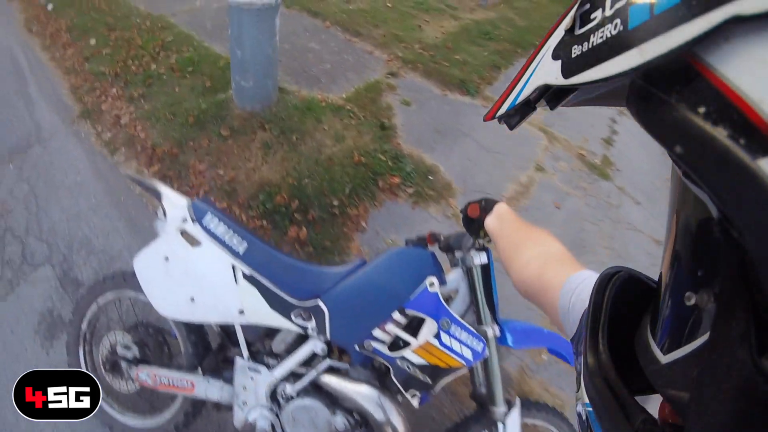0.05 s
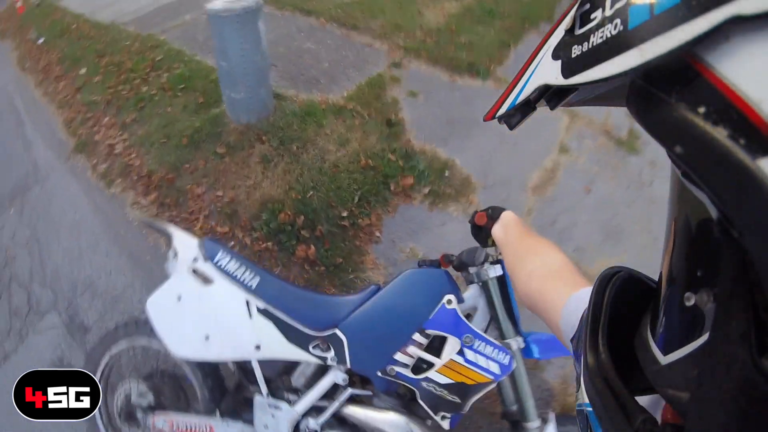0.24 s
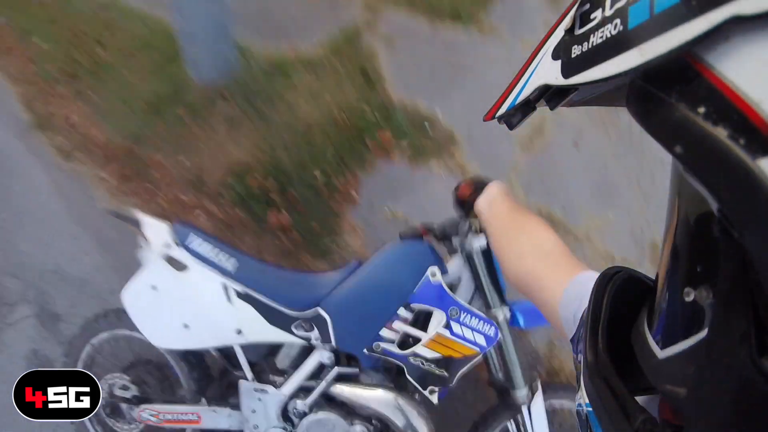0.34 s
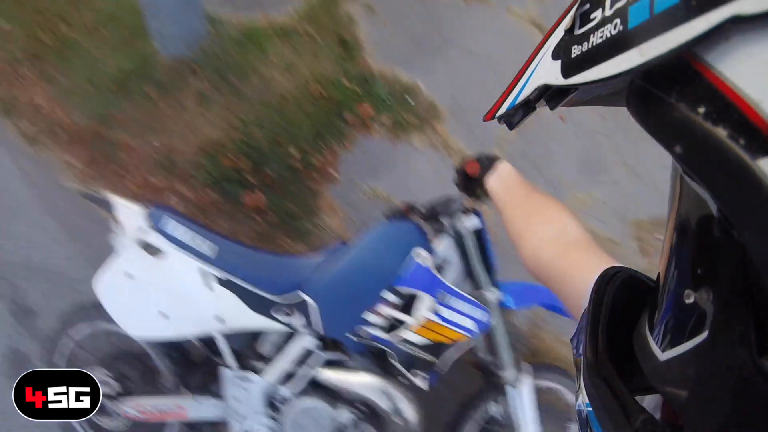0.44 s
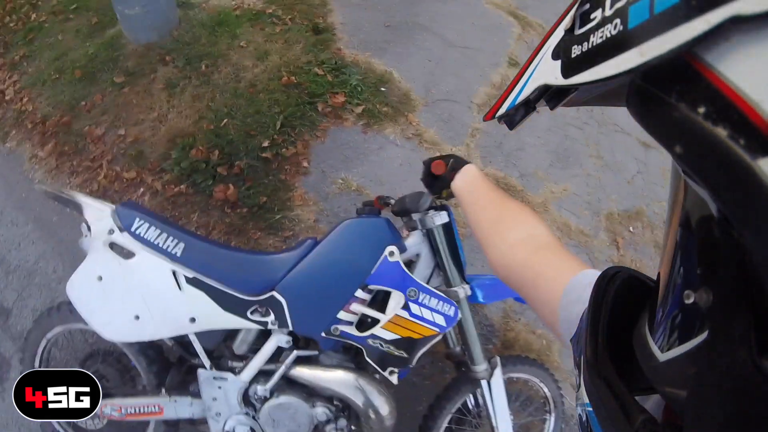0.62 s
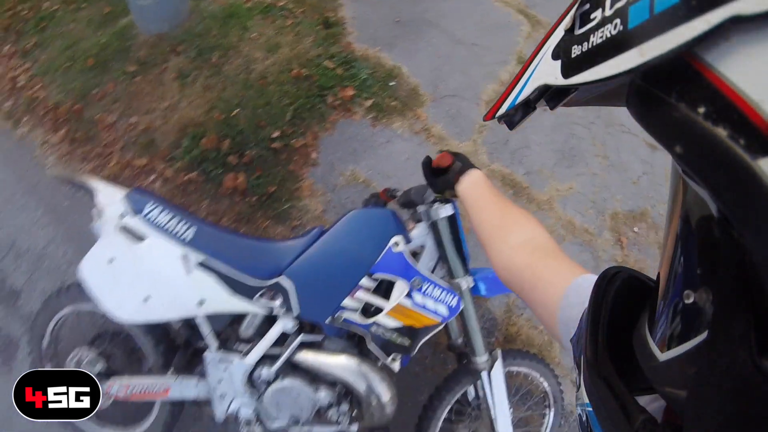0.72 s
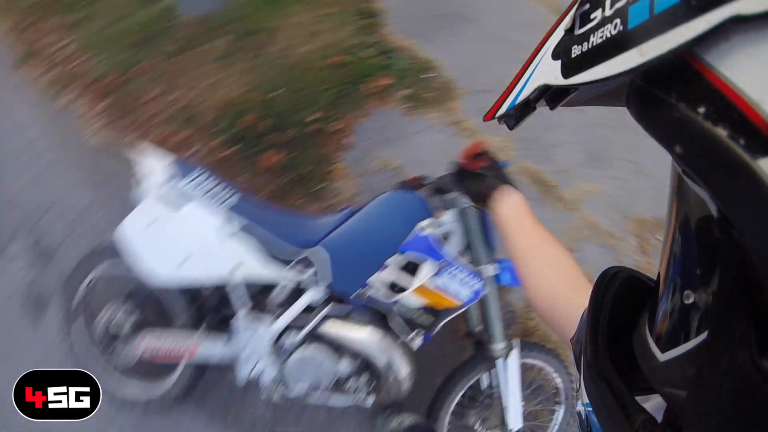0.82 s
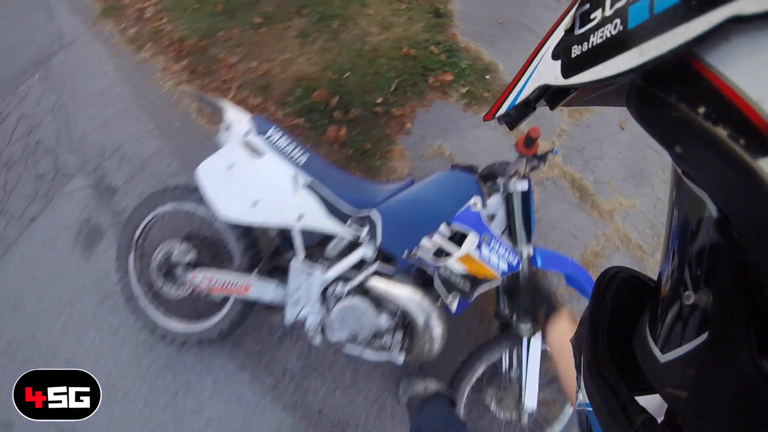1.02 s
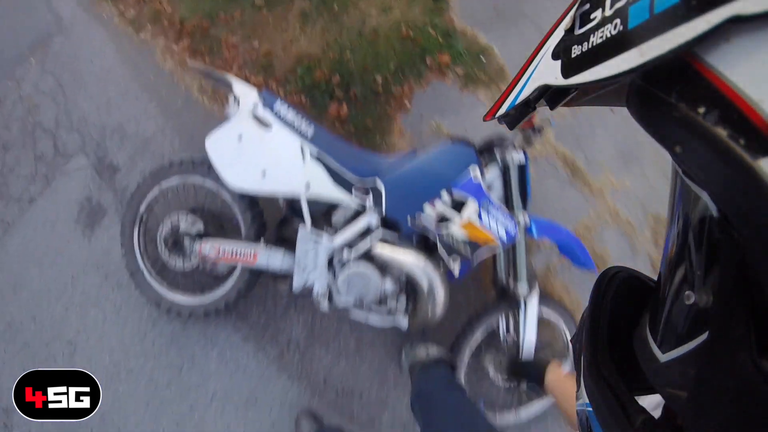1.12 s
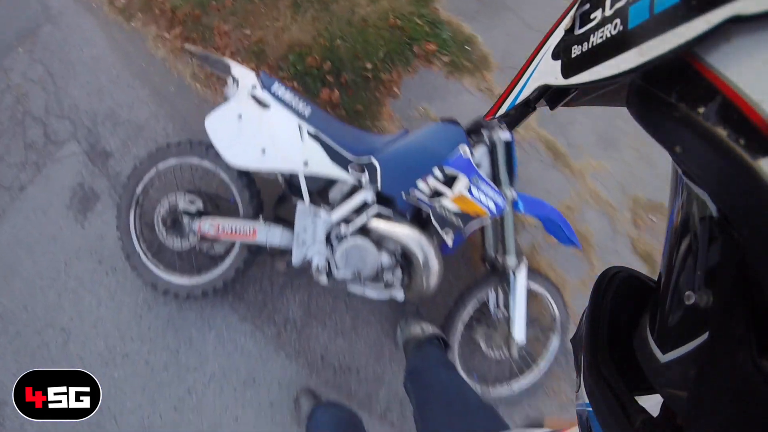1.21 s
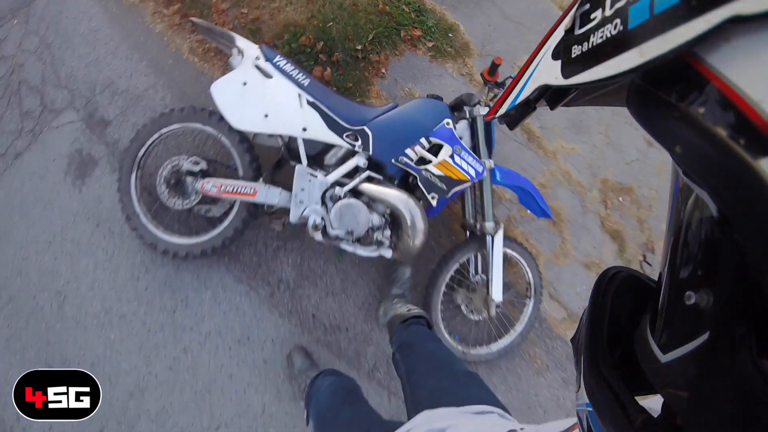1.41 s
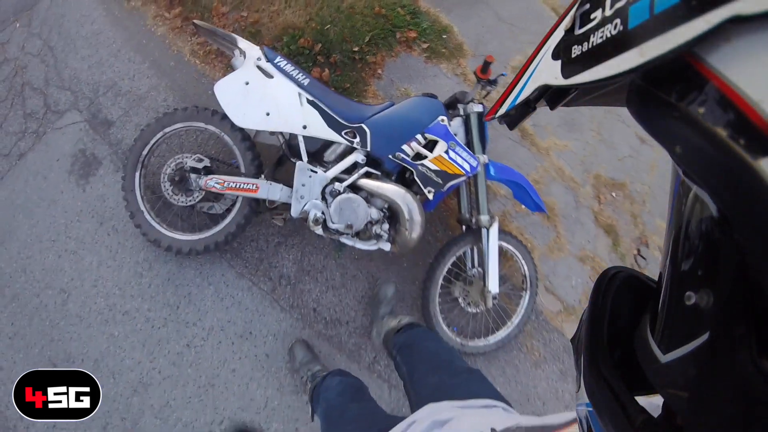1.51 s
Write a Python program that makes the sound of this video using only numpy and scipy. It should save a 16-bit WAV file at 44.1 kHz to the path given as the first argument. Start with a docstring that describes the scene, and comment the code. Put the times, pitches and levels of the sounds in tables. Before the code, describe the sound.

Close by, a dirt bike rattles sharply twice as its stand clanks onto the pavement and takes the weight. Fading plastic knocks follow, then faint boot scuffs, over light wind rumble and a distant outdoor rush.

```python
"""A dirt bike, engine off, is let down onto its stand on pavement.
Loose metal parts clack in two bursts, a lever pings against its stop and the stand clanks.
The frame thuds as the weight lands, and plastic panels knock ever more softly as the bike settles.
A tyre rolls faintly on grit at the start, and boots scuff near the end.
Light wind and a distant outdoor rush go on behind it all."""
import sys
import numpy as np
from scipy import signal
from scipy.fft import rfft, irfft, next_fast_len
from scipy.io import wavfile
from scipy.ndimage import map_coordinates

SR = 44100
rng = np.random.default_rng(int(sys.argv[2]) if len(sys.argv) > 2 else 0)


def transcribe(u):
    """Save the signal u as a 16-bit wav file named by the first command-line argument.

    u: samples, shape (n,) or (channels, n), limited to [-1, 1]; the rate is SR.
    q: integer samples, one column per channel.
    """
    v = np.clip(np.atleast_2d(u).T, -1, 1)
    q = np.round(v * 32767).astype(np.int16)
    wavfile.write(sys.argv[1], SR, q)


N = 68355
T = np.arange(N) / SR
RING_T = T[:SR // 3]  # the seconds that pass during one hit


# Loose parts colliding. Each row: start in seconds, ring, crack and sizzle levels in dB,
# chatter fade time in seconds, pitch multiplier. A fade time is how long a 60 dB drop takes.
METAL_HITS = [(0.2194, -27, -26.5, -54, 0.041, .97), (0.2225, -24.5, -28, -33, 0.045, .99),
              (0.2325, -17, -31, -24, 0.037, 1.02), (.2368, -28, -25.5, -25.5, 0.048, 1.0),
              (0.255, -37, -27.5, -37.5, 0.054, 1.01), (0.2621, -40, -26.5, -33.5, 0.025, 1.01),
              (.3515, -65, -40, -46.5, 0.078, 2.8), (.3810, -28, -32, -29.5, 0.03, 1.1),
              (0.3846, -36, -30.5, -31, 0.038, 1.1), (.3972, -27, -37, -31.5, 0.083, 1.0),
              (.4030, -43, -27.5, -34.5, 0.087, 1.0), (.4085, -29, -23.5, -26, 0.028, 1.04),
              (.4142, -21, -21, -27.5, 0.046, .88), (.4225, -25, -31.5, -34, 0.072, 1.0),
              (.4372, -38, -30, -41, 0.086, 1.1), (0.5214, -62, -33, -37, 0.029, 1.0),
              (.6380, -40, -42, -42.5, 0.038, 2.12), (.6630, -67, -65, -53, 0.032, 1.0),
              (0.733, -50, -53, -49, 0.048, 1.0), (1.052, -55.5, -62, -63, 0.027, 1.75)]
# The parts' tones. Each row: base pitch in Hz, relative level in dB, fade time in seconds.
METAL_TONES = [(909, -13, 0.045), (1660, -15, 0.018), (1798, 0.5, 0.032), (1946, -9, 0.055),
               (2444, -2, 0.031), (2748, -9, 0.051), (3320, -9.5, 0.028), (5184, -15, .03)]

def metal_parts():
    """Loose metal parts clack, ring and go on rattling against each other."""
    rings = place((start, amp(db) * ring(METAL_TONES, ratio)) for start, db, _, _, _, ratio in METAL_HITS)
    bursts = place((start, chatter(crack_db, sizzle_db, fade_s))
                   for start, _, crack_db, sizzle_db, fade_s, _ in METAL_HITS)
    return rings + bursts + shake(bursts, level_db=-9.5)


# The midrange crack of a hit. Each row: frequency in Hz, relative level in dB.
CRACK_COLOUR = [(150, -18.5), (350, -0.5), (560, -7.5), (800, -2), (1500, -1.5), (2900, -5.5),
                (3900, -21.5), (8000, -30.5), (13000, -57)]
# The bright sizzle of a hit. Each row: frequency in Hz, relative level in dB.
SIZZLE_COLOUR = [(2000, -12), (3600, -2), (4400, -4.5), (5700, 0.5), (6500, -1), (7200, -7.5), (8700, -7.5),
                 (11000, -24), (14000, -54)]
# A thin steely ring. Each row: base pitch in Hz, relative level in dB, fade time in seconds.
STEEL_TONES = [(6443, -5, 0.041), (6540, -7.5, 0.028)]

def chatter(crack_db, sizzle_db, fade_s):
    """One contact is a cluster of tiny impacts, so it sounds harsh and grainy."""
    crack = amp(crack_db) * noise(CRACK_COLOUR, len(RING_T))
    sizzle = amp(sizzle_db) * noise(SIZZLE_COLOUR, len(RING_T))
    grains = unit(amp(1.5 * wobble(per_second=1800)))[:len(RING_T)]
    detune = 1 + 0.0081 * rng.normal()  # loose parts never sit the same way twice
    steel = amp(sizzle_db) * ring(STEEL_TONES, detune)
    return (crack + sizzle) * grains * fade(fade_s, rise_s=0.00044) + steel


# Lever strikes. Each row: start in seconds, level in dB, change in dB for the upper tones and tick.
LEVER_HITS = [(0.3065, -19.5, -2), (0.3268, -25, -6.5), (0.4158, -24, -18)]
# The lever's tones. Each row: pitch in Hz, relative level in dB, fade time in seconds.
LEVER_TONES = [(1703, -1, 0.073), (2947, 3, 0.016), (3170, -8.5, 0.029)]

def lever():
    """The lever pings on its stop three times, each duller than the last."""
    pings = []
    for start, db, bright_db in LEVER_HITS:
        low = ring(LEVER_TONES[:1])
        upper = ring(LEVER_TONES[1:])
        tick = chatter(crack_db=-7.5, sizzle_db=-10.5, fade_s=0.018)
        pings.append((start, amp(db) * (low + amp(bright_db) * (upper + tick))))
    return place(pings)


# The stand meeting the pavement. Each row: start in seconds, level in dB.
STAND_HITS = [(0.4113, -26), (0.4134, -13)]
# The stand's tones. Each row: pitch in Hz, relative level in dB, fade time in seconds.
STAND_TONES = [(1573, 0.5, 0.026), (2997, -0.5, 0.02)]

def stand():
    """The stand touches down, then takes the weight: a short, hard double clank."""
    return place((start, amp(db) * ring(STAND_TONES)) for start, db in STAND_HITS)


# Weight landing on frame and tyres. Each row: start in seconds, level in dB, pitch multiplier.
FRAME_HITS = [(0.2222, -33, 1.72), (0.2315, -24, 1.245), (0.2383, -26, 1.7), (0.2612, -31, 1.23),
              (.2710, -26, 1.3), (.2960, -38, 1.12), (.3990, -18.5, 1.03), (.4110, -23, 0.93),
              (0.427, -30, 0.977), (0.519, -29.5, 0.7), (0.619, -37, 1.03), (.6900, -38.5, 1.03)]
# The frame's low tones. Each row: base pitch in Hz, relative level in dB, fade time in seconds.
FRAME_TONES = [(67.4, -9, 0.084), (137.6, -10, 0.046), (211, -0.5, 0.044), (379, -11, 0.047)]
# Its hollow ring. Each row: pitch in Hz, relative level in dB, fade time in seconds.
HOLLOW_TONES = [(684, -6, 0.042), (758, -12, 0.047)]

def frame(hard_hit_db=-20):
    """The bike's weight lands in dull thuds; the harder the hit, the more hollow ring it has."""
    thuds = []
    for start, db, ratio in FRAME_HITS:
        thud = ring(FRAME_TONES, ratio)
        hollow = amp(db - hard_hit_db) * ring(HOLLOW_TONES)
        thuds.append((start, amp(db) * (thud + hollow)))
    hits = place(thuds)
    return hits + shake(hits, level_db=-10.5)


# Panel knocks. Each row: start in seconds, then ring, crack and sizzle levels in dB.
PANEL_HITS = [(0.3857, -26, -41, -48), (0.477, -28, -35.5, -47), (0.481, -21.5, -26.5, -41),
              (0.5166, -26.5, -31, -31.5), (0.570, -53, -42, -56), (.5990, -27.5, -35, -48),
              (0.6155, -27, -32.5, -38.5), (0.621, -32, -40.5, -63), (0.6319, -58, -36, -64),
              (0.6818, -41, -46, -69), (0.7158, -33.5, -47.5, -57), (0.824, -46, -52, -65.5)]
# The panels' tones. Each row: pitch in Hz, relative level in dB, fade time in seconds.
PANEL_TONES = [(332, -6, 0.03), (1026, -8.5, 0.019), (1146, 0.5, 0.019), (1330, -5, 0.018)]

def panels():
    """Plastic panels give hollow knocks as the bike rocks to rest."""
    knocks = place((start, amp(db) * ring(PANEL_TONES) + chatter(crack_db, sizzle_db, fade_s=0.027))
                   for start, db, crack_db, sizzle_db in PANEL_HITS)
    return knocks + shake(knocks, level_db=-24.0)


# How long small parts keep shaking. Each row: frequency in Hz, fade time in seconds.
SHAKE_FADES = [(150, 0.57), (500, 0.55), (1500, 0.39), (5000, 0.31), (12000, 0.18)]

def shake(hits, level_db, taps_per_second=700, rise_s=0.0074):
    """Small parts shake after each hit in a spray of tiny taps; the treble dies first."""
    t = T[:SR // 2]
    taps = rng.standard_normal(len(t)) * (rng.random(len(t)) < taps_per_second / SR)
    taps *= 1 - np.exp(-t / rise_s)
    hz, seconds, bands = signal.stft(taps, SR, nperseg=256)
    decay = np.exp(-np.log(1000) * seconds / value_at(SHAKE_FADES, hz)[:, None])
    _, tail = signal.istft(bands * decay, SR, nperseg=256)
    tail /= np.linalg.norm(tail)
    return amp(level_db) * signal.fftconvolve(hits, tail)[:N]  # gives every hit this tail


# One tyre roll, then two boot scuffs.
# Each row: loudest moment in seconds, level in dB, rough half length in seconds.
GRIT_SCUFFS = [(0.125, -60, 0.13), (1.246, -57.5, 0.013), (1.467, -62, 0.15)]
# Grit on the pavement. Each row: frequency in Hz, relative level in dB.
GRIT_COLOUR = [(800, -2), (1500, -6), (2800, -10.5), (3700, -5), (4700, -7.5), (5800, -7.5), (7500, -13),
               (10000, -32), (14000, -49)]

def scuffs():
    """Soft scuffs on grit: a tyre rolls faintly at the start, then boots scuff near the end."""
    swells = sum(amp(db) * np.exp(-.5 * ((T - peak_s) / half_s) ** 2)
                 for peak_s, db, half_s in GRIT_SCUFFS)
    grit = noise(GRIT_COLOUR, N) * amp(2.3 * wobble(per_second=400))
    return swells * unit(grit)


# The wind's rumble. Each row: frequency in Hz, relative level in dB.
WIND_COLOUR = [(12, 0.5), (22, 1), (44, 2), (76, -7.5), (110, -2.5), (240, -12), (480, -57.5)]
# Its rise and fall. Each row: time in seconds, level in dB before the random gusts.
WIND_LEVELS = [(0, -46), (.2, -50.5), (.42, -42.5), (.62, -49), (.85, -48), (1.1, -45), (1.35, -46),
               (1.55, -50)]

def wind():
    """Light wind buffets the microphone with a low, lumpy rumble."""
    level_db = np.interp(T, *np.transpose(WIND_LEVELS))
    gusts_db = 1.8 * wobble(per_second=14.92)
    return amp(level_db + gusts_db) * noise(WIND_COLOUR, N)


# The far-off rush. Each row: frequency in Hz, relative level in dB.
RUSH_COLOUR = [(150, -21), (290, -4.5), (400, -9.5), (600, -7), (900, -0.5), (1130, -9), (1500, -6.5),
               (2100, -15.5), (3000, -25), (3850, -33.5), (4550, -19), (5000, -34.5), (5600, -27),
               (6050, -28), (6500, -24), (7400, -30), (9300, -32.5), (10500, -44), (12500, -39),
               (14000, -75)]
# Its slow drift. Each row: time in seconds, level in dB before the slight flutter.
RUSH_LEVELS = [(0, -49), (.2, -47.5), (.8, -52), (1.55, -51)]

def distant_rush():
    """A faint, nearly steady outdoor rush comes from far away."""
    level_db = np.interp(T, *np.transpose(RUSH_LEVELS))
    flutter_db = 0.26 * wobble(per_second=12.2)
    return amp(level_db + flutter_db) * noise(RUSH_COLOUR, N)


def ring(tones, ratio=1, scatter_db=2.5):
    """A struck part rings with a few fading tones, balanced a little differently each time."""
    sound = 0
    for k, (hz, db, fade_s) in enumerate(tones):
        gain = (-1) ** k * amp(db + scatter_db * rng.normal())  # every other tone starts downward
        sound += gain * fade(fade_s, rise_s=0.00084) * np.sin(2 * np.pi * hz * ratio * RING_T)
    return sound


def fade(fade_s, rise_s):
    """Rise quickly, then die away by 60 dB every fade_s seconds."""
    return np.exp(-np.log(1000) * RING_T / fade_s) * (1 - np.exp(-RING_T / rise_s))


def noise(colour, size):
    """Noise of strength 1 whose lows and highs follow a colour table."""
    padded = next_fast_len(size + 8192)
    gains = amp(value_at(colour, np.fft.rfftfreq(padded, 1 / SR)))
    spectrum = rfft(rng.standard_normal(padded))
    return unit(irfft(spectrum * gains, padded)[:size])


def wobble(per_second):
    """A smooth curve through this many random values a second."""
    return map_coordinates(rng.standard_normal(4096), [T * per_second], mode="wrap")


def value_at(table, hz):
    """Read between a table's rows, with frequency spaced in octaves."""
    row_hz, values = np.transpose(table)
    return np.interp(np.log(hz + 1), np.log(row_hz + 1), values)


def amp(db):
    """Turn decibels into a multiplier."""
    return 10 ** (np.asarray(db) / 20)


def unit(x):
    """Scale a signal to an average strength (rms) of 1."""
    return x / np.sqrt(np.mean(x ** 2) + 1e-20)


def place(events):
    """Mix sounds onto one track, each at its start in seconds."""
    track = np.zeros(N + SR)
    for start, sound in events:
        track[round(start * SR):][:len(sound)] += sound
    return track[:N]


def scene():
    """The settling bike, the scuffs and the open air in one channel."""
    bike = metal_parts() + lever() + stand() + panels() + frame()
    return (bike + scuffs() + distant_rush() + wind())[None]


def record(dry):
    """Cut away the very highest treble."""
    top_hz = 14200
    padded = next_fast_len(N + 8192)
    kept = np.fft.rfftfreq(padded, 1 / SR) < top_hz
    return irfft(rfft(dry, padded) * kept, padded)[:, :N]


dry = scene()
out = record(dry)
transcribe(out)
```